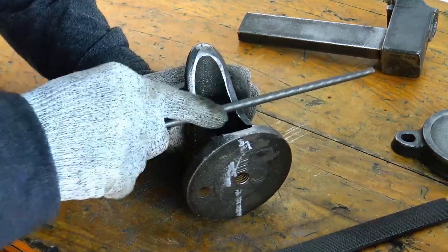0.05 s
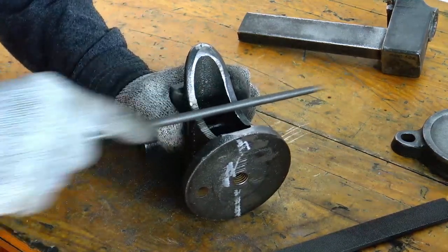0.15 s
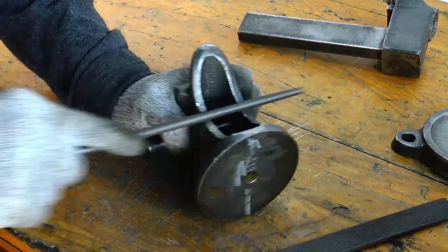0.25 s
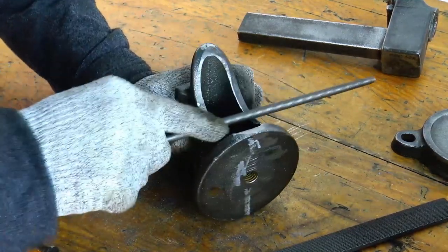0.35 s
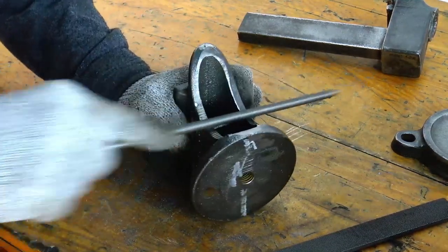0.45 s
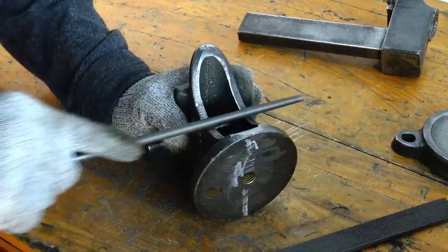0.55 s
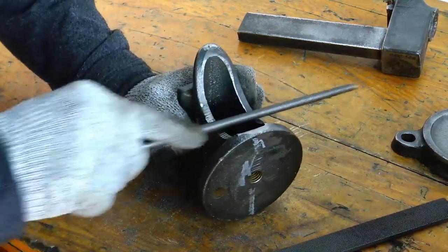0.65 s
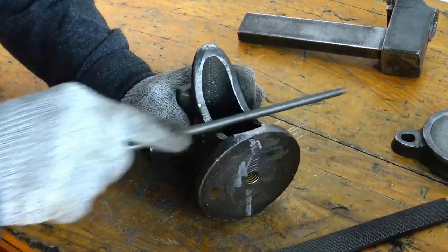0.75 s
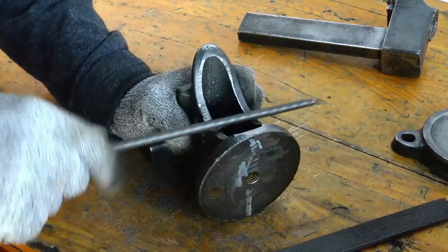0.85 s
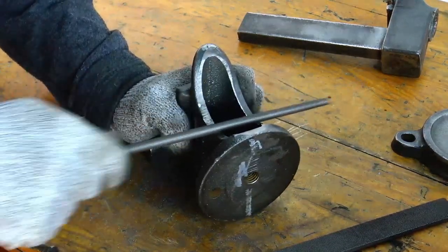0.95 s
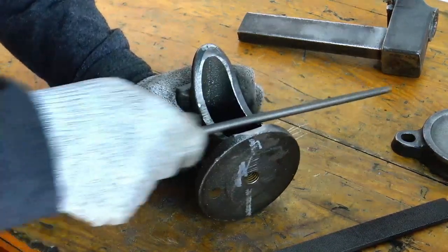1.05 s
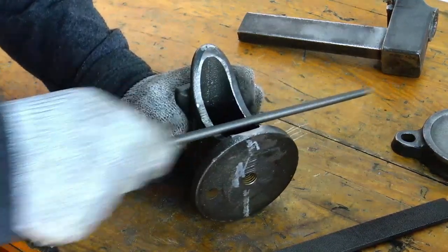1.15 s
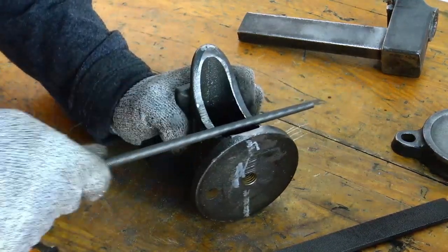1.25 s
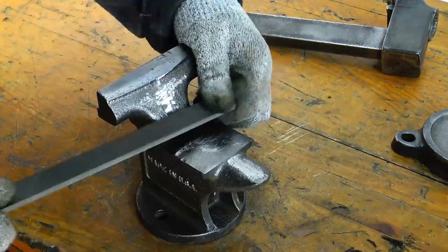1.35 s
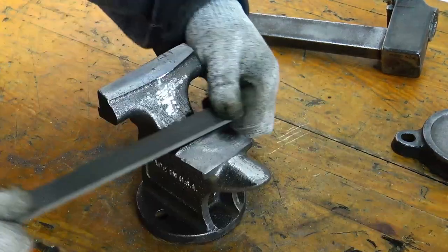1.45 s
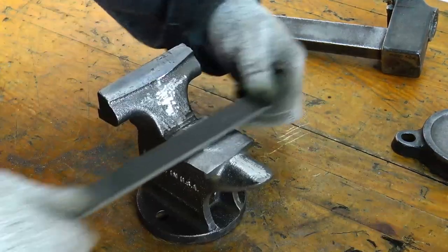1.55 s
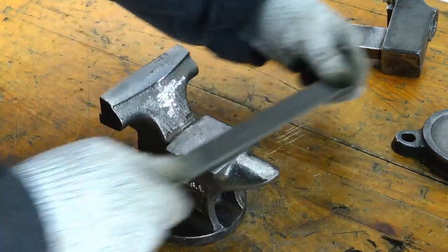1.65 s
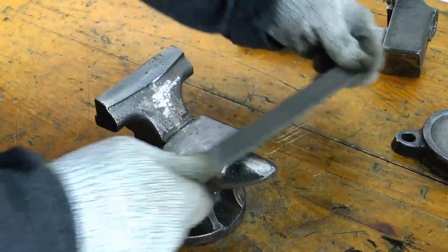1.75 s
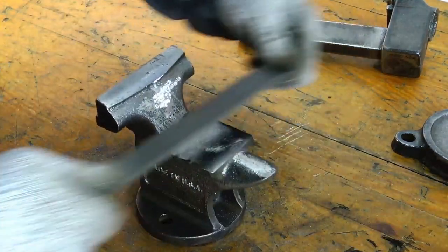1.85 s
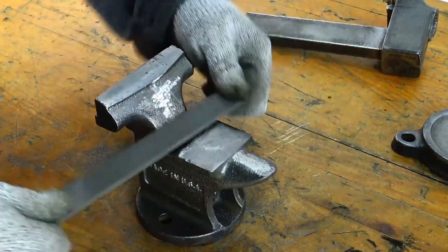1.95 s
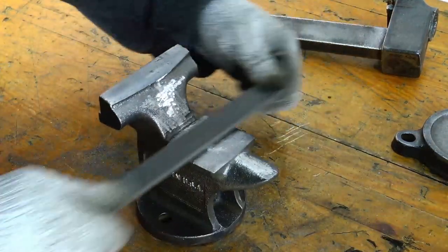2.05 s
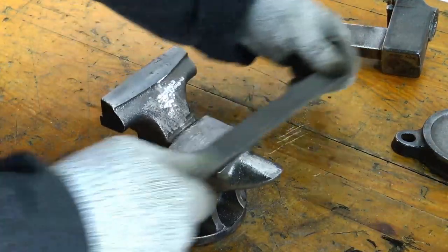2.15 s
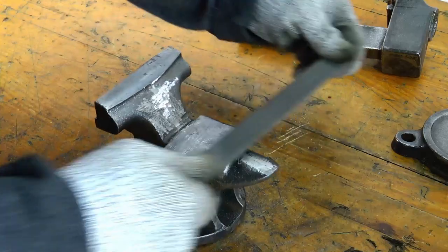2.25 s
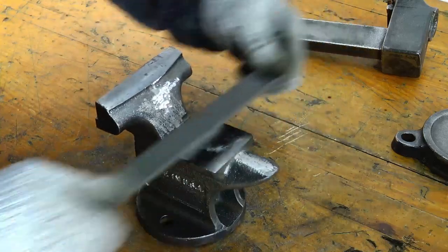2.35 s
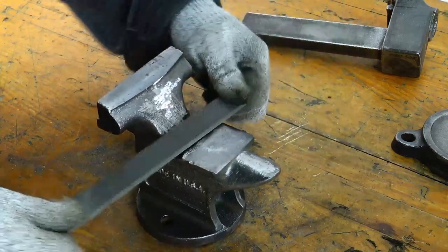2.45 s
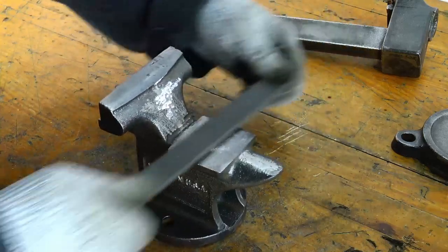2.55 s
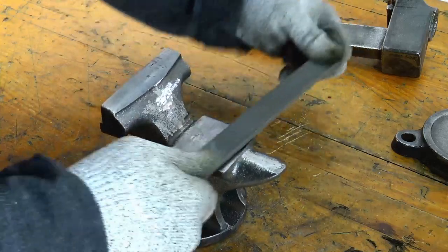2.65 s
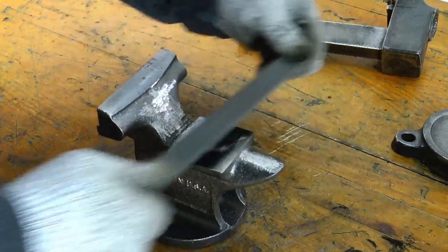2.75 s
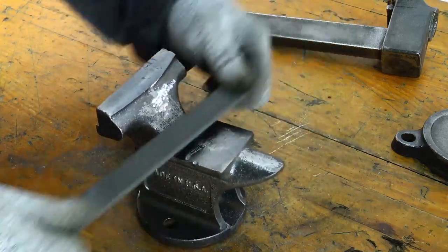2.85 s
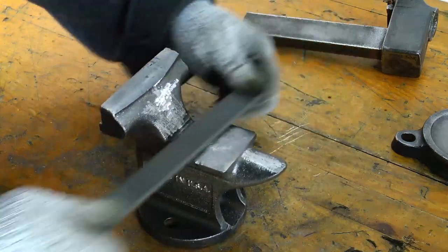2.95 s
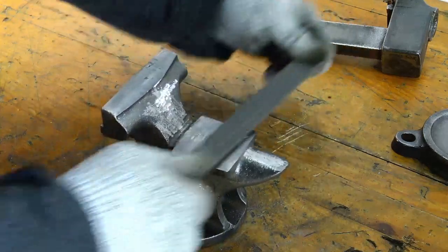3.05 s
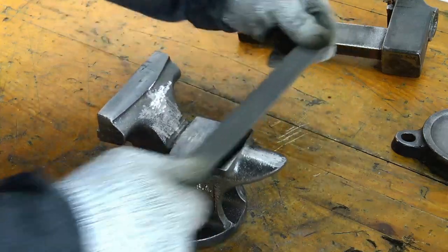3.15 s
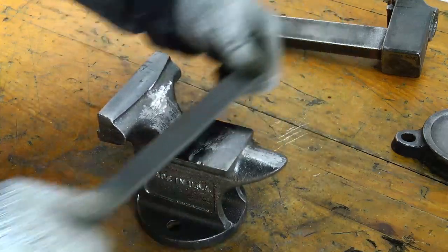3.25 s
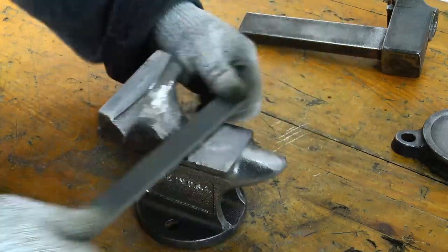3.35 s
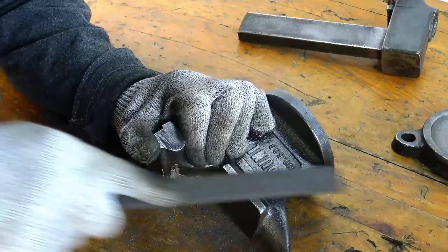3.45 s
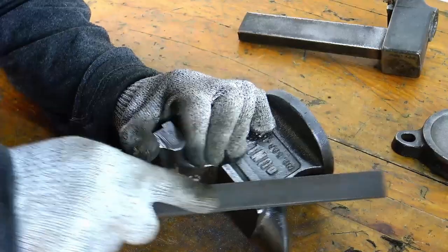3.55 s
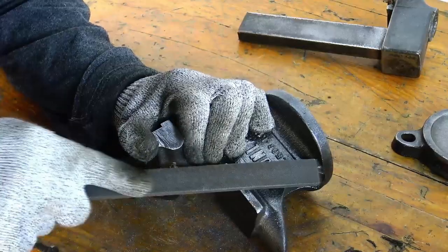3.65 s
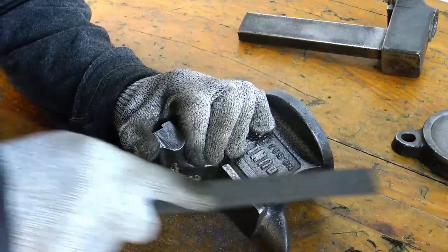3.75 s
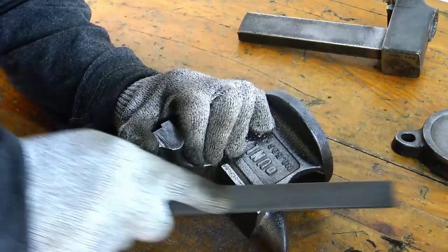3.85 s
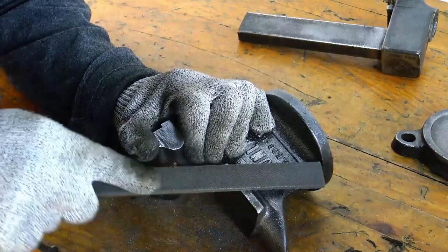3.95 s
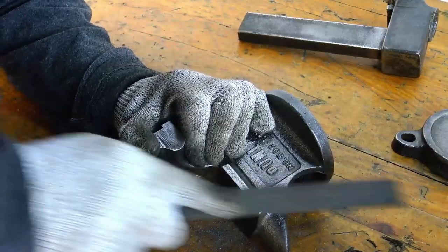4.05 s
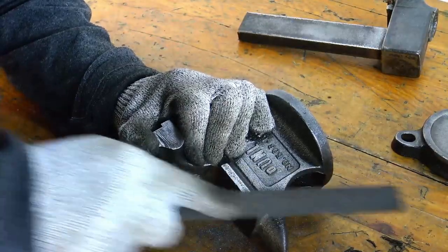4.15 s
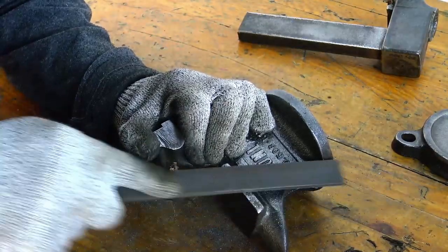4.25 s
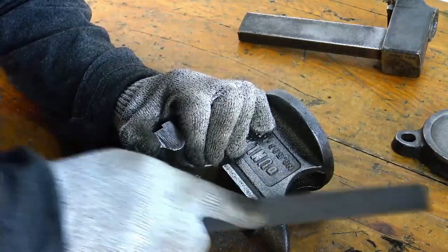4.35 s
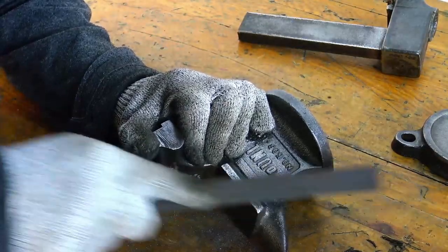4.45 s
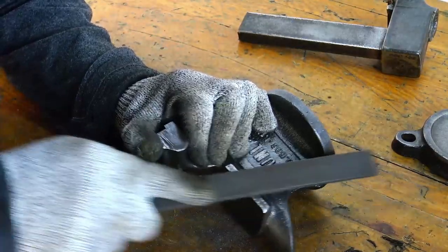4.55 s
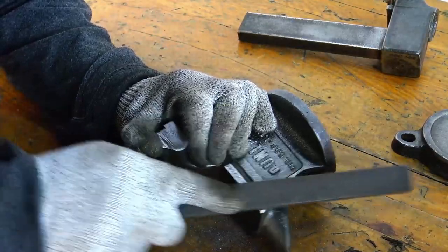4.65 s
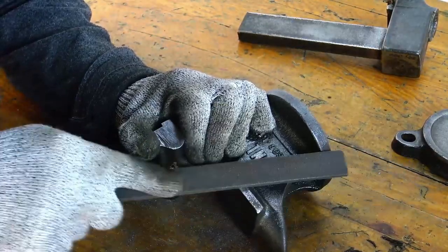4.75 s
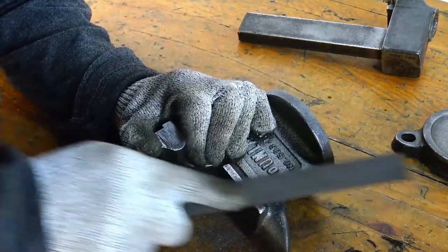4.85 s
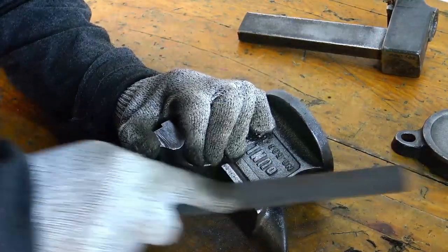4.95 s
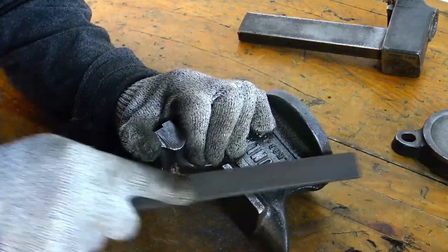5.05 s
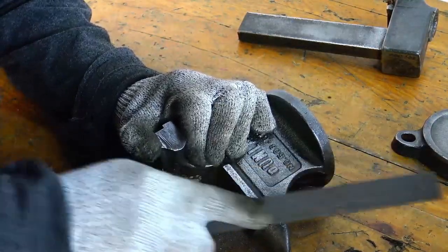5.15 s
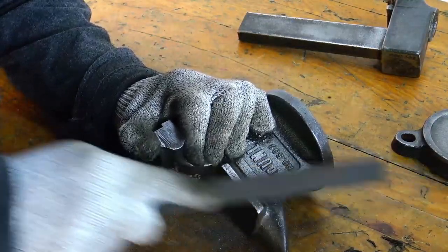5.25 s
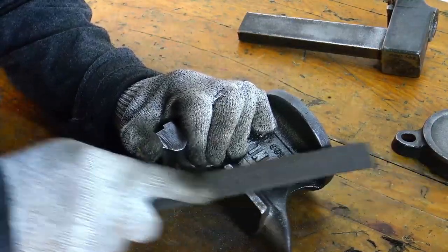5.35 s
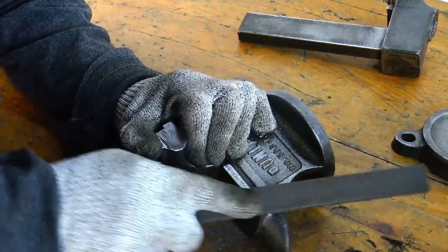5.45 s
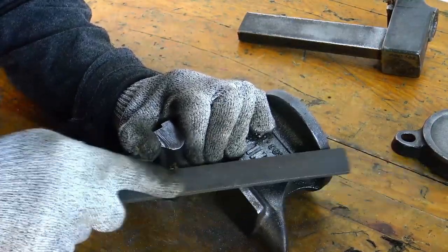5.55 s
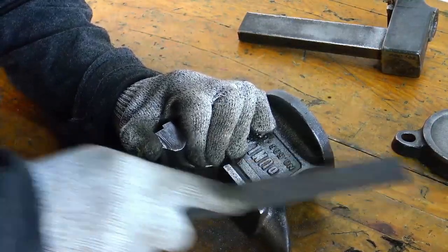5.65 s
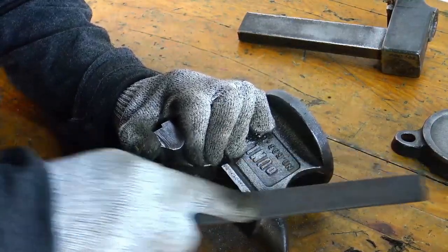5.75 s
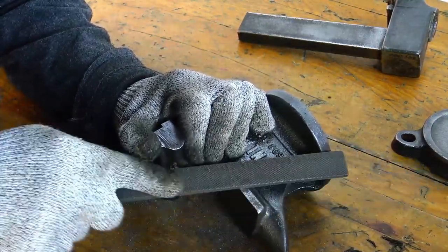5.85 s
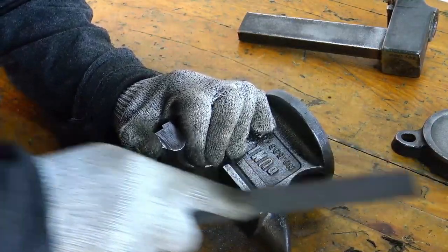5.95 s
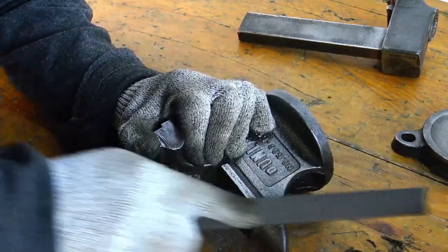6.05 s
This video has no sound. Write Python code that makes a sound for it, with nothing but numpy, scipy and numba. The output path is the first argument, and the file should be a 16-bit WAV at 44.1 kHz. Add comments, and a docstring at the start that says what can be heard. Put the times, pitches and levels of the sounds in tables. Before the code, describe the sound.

Close up in a dull, quiet workshop, a coarse round file saws quickly in a hollow iron casting, growling and juddering, with thin squeals on some strokes. Then four separate long sweeps of a flat file, brighter and hissing, with pitch gliding, clacks and wooden thumps between. Finally the flat file scrubs an iron edge in rapid, alternating short strokes until the end.

```python
"""A round file saws to and fro in a hollow iron casting, squealing on some strokes; a flat file then makes
long one-way strokes, lifted and set down between them, and at last scrubs an edge with quick short strokes.
Teeth and grit excite file, casting and bench as filtered impulse trains; damped modes of the iron ring on,
steel clacks on iron, and the vice rocks on the wooden bench, in a dull room with a quiet background."""
import sys
import numpy as np
from scipy import signal
from scipy.io import wavfile
from scipy.ndimage import uniform_filter1d
from numba import njit

SR = 44100
rng = np.random.default_rng(int(sys.argv[2]) if len(sys.argv) > 2 else 0)


def inscribe(sig):
    """Save sig as 16-bit PCM at rate SR to the path in sys.argv[1].

    A 1-D sig is mono; a 2-D sig holds one channel per row.
    Samples are clipped to [-1, 1] before scaling.
    """
    pcm = np.round(np.clip(np.atleast_2d(sig).T, -1, 1) * 32767)
    wavfile.write(sys.argv[1], SR, pcm.astype(np.int16))


N = 269451
T = np.arange(N) / SR

# Damped resonances of flat file, vice and bench.
# Each row: centre in Hz, half-width in Hz, lift over the broad spectrum in dB.
FLAT_FILE_BODY = [(177.6, 32, 13), (400, 29, 3.7), (654, 150, 5.6), (970, 27, 6.5), (4090, 190, 10.9),
                  (4550, 100, 3), (5630, 540, 9.7), (5840, 420, 1.1), (7850, 500, 9.6), (9330, 350, 7),
                  (9900, 100, 3.7), (11420, 220, 11), (13400, 800, 12)]
# Long-ringing modes of the vice. Each row: frequency in Hz, relative level in dB, 60 dB decay time in seconds.
VICE_RING = [(3072, -12, 0.24), (3990, -35.5, .2), (5250, -29, 0.13), (5405, -25.5, 0.29),
             (5920, -19.5, 0.098), (6490, -15.5, .15), (7500, -17, 0.11), (8530, -11, .2),
             (10435, -16, .22), (11900, -30, 0.18), (14420, -18, .1)]


def from_db(db):
    """Amplitude ratio: twenty decibels are a factor of ten."""
    return 10 ** (np.asarray(db) / 20)


def rms_one(x):
    """Normalisation to unit mean power."""
    return x / np.sqrt(np.mean(x ** 2) + 1e-20)


def steady(x, size=1100):
    """Envelope removal: division by the short-time RMS keeps the fine grain; size in samples."""
    power = uniform_filter1d(uniform_filter1d(x ** 2, size), size)
    return x / np.sqrt(np.abs(power) + 1e-20)


def drift(rate):
    """Random modulation: straight lines join normal random knots of unit spread, `rate` a second."""
    knots = rng.standard_normal(N // 20)
    return np.interp(T * rate, np.arange(len(knots)), knots)


def band(x, hz, kind):
    """Band selection by a Butterworth filter of design order four."""
    return signal.sosfilt(signal.butter(4, hz, kind, fs=SR, output="sos"), x + 1e-18)


def colour(x, spectrum, body=(), size=8192):
    """Minimum-phase filtering: a broad spectrum with resonant humps, made causal through its cepstrum."""
    grid = np.maximum(np.fft.rfftfreq(size, 1 / SR), 1)
    points = np.array(spectrum)
    level = np.interp(np.log(grid), np.log(points[:, 0]), points[:, 1])
    for hz, half_width, lift_db in body:
        level = level + lift_db / (1 + ((grid - hz) / half_width) ** 2)
    # folding the cepstrum onto positive time gives minimum phase
    cepstrum = np.fft.irfft(np.log(from_db(level)))
    cepstrum[1:size // 2] *= 2
    cepstrum[size // 2 + 1:] = 0
    response = np.fft.irfft(np.exp(np.fft.rfft(cepstrum)))
    return signal.fftconvolve(x, response)[:len(x)]


def ring(x, hz, t60):
    """Damped oscillator: a unit click starts a decaying sine of initial height 1."""
    radius = from_db(-60 / (t60 * SR))
    angle = 2 * np.pi * hz / SR
    return signal.lfilter([0, np.sin(angle)], [1, -2 * radius * np.cos(angle), radius ** 2], x + 1e-18)


def iron(x, modes):
    """Modal superposition: a vibration feeds the long modes of the metal in parallel."""
    return sum(from_db(db) * ring(x, hz, t60) for hz, db, t60 in modes) / 100


@njit
def glide(x, turn, keep):
    """Time-varying resonance: a rotating, decaying phasor; turn in radians a sample."""
    out, state = np.zeros(len(x)), 0j
    for i in range(len(x)):
        state = state * keep * np.exp(1j * turn[i]) + x[i]
        out[i] = state.real
    return out


def blade(force, hz, width_hz):
    """Forced resonance: a bending mode, of bandwidth `width_hz`, driven at the contact."""
    return steady(glide(force, 2 * np.pi * hz / SR, np.exp(-np.pi * width_hz / SR)))


def bending(force, place, modes, stray):
    """Length sets pitch: pushed forward, the longer tip side falls while the handle side rises."""
    stray_octaves, rate, flicker_db = stray
    total = 0
    for hz, octaves, width, db in modes:
        centre = hz * 2 ** (octaves * (place - .5) + stray_octaves * drift(rate))
        total = total + from_db(db + flicker_db * drift(35)) * blade(force, centre, width)
    return total


def flares(force, modes):
    """Selective excitation: the wandering contact favours fixed modes in turn."""
    flare_db, flares_per_s = 7, 37
    total = 0
    for hz, width, db in modes:
        gain = from_db(db + flare_db * drift(flares_per_s))
        total = total + gain * blade(force, np.full(N, hz), width)
    return total


def hump(start, end, peak):
    """Stroke kinematics: a rise from rest to 1 at the share `peak` of the stroke, and a return to rest."""
    top = start + np.clip(peak, .05, .95) * (end - start)
    return np.sin(np.pi / 2 * np.interp(T, [start, top, end], [0, 1, 0]))


def swells(rows):
    """Amplitude modulation: the gain of a note that swells and fades once for each row."""
    return sum(from_db(db) * hump(start, end, peak) for start, end, peak, db in rows)


def motion(strokes, law):
    """Power-law excitation: progress 0-1, and gains of rumble and growl (pressure) and rasp (speed)."""
    # Time constants in seconds with which bench, casting and teeth build up and die away.
    lag_s = (0.016, 0.0034, 0.0013)
    progress, gains = np.zeros(N), np.zeros((3, N))
    for start, end, fastest, hardest, *levels_db in strokes:
        during = (T >= start) & (T < end)
        begun = T >= start
        progress[begun] = np.minimum((T[begun] - start) / (end - start), 1)
        pressure = hump(start, end, hardest)[during]
        speed = hump(start, end, fastest)[during]
        for k, drive in enumerate((pressure, pressure, speed)):
            gains[k, during] += from_db(levels_db[k]) * drive ** abs(law[k])
    keeps = np.exp(-1 / (np.array(lag_s) * SR))
    lagged = [signal.lfilter([1 - keep], [1, -keep], gain + 1e-18) for keep, gain in zip(keeps, gains)]
    return progress, lagged


def teeth(progress, tooth_hz, uneven, grit_per_s, grit_db, spread_db):
    """Impulsive excitation: teeth strike at a rate set by hand speed; chips break off at random."""
    speed = .25 + .75 * np.sin(np.pi * progress)
    tooth_rate = tooth_hz * speed * (1 + uneven * drift(900) + .04 * drift(40))
    passed = np.cumsum(tooth_rate) / SR
    # each strike is shared between two samples, by where it falls
    edge = np.diff(np.floor(passed), prepend=0) > 0
    late = np.clip((passed % 1) / np.maximum(np.gradient(passed), 1e-6), 0, 1)
    force = edge * from_db(2.5 * rng.standard_normal(N))
    strikes = force * (1 - late) + np.roll(force * late, -1)
    strikes = strikes - uniform_filter1d(strikes, size=90)
    chips = (rng.random(N) < grit_per_s * speed / SR) * rng.choice([-1, 1], N)
    chips = chips * from_db(spread_db * np.minimum(rng.exponential(1, N), 4))
    return steady(strikes) + from_db(grit_db) * steady(chips)


def patchy(force):
    """Band-wise modulation: rows of teeth bite unevenly, so the brightness of the cut comes in clumps."""
    patch_db, patches_per_s = 3.2, 32
    bands, rest = [], force
    # edges a little under a third of an octave apart
    for hz in np.geomspace(1100, 12000, 13):
        low = signal.sosfiltfilt(signal.butter(4, hz, fs=SR, output="sos"), rest)
        bands.append(low)
        rest = rest - low
    return sum(part * from_db(patch_db * drift(patches_per_s)) for part in bands + [rest])


def rasp(force, gains, spectrum, body, chatter_db, chatter_rate):
    """Source and filter: the chattering cutting force shakes bench (low), casting (mid) and teeth (high)."""
    chatter = from_db(chatter_db * drift(chatter_rate))
    shaken = colour(patchy(force) * chatter, spectrum, body)
    parts = band(shaken, 300, "low"), band(shaken, [300, 1800], "band"), band(shaken, 1800, "high")
    return sum(gain * steady(part, size=700) for gain, part in zip(gains, parts))


def round_file():
    """Forced vibration with judder: a coarse round file saws in a hollow casting held in the hand."""
    # Each row: start and end in seconds, shares of the stroke at which the hand is fastest and presses
    # hardest, then relative levels in dB of bench rumble, casting growl and rasp of the teeth.
    strokes = [(-0.04, 0.115, 0.49, 0.25, -33.5, -23.7, -35.5), (0.114, 0.272, 0.46, 0.63, -37, -19.5, -28),
               (0.275, 0.431, 0.65, 0.33, -32, -35, -37.5), (0.423, 0.581, 0.64, 0.81, -32.9, -23.5, -28),
               (0.581, 0.775, 0.46, 0.26, -33.5, -30.5, -41), (0.76, 0.948, 0.24, 0.25, -40, -35, -42.5),
               (0.947, 1.146, 0.68, 0.69, -41.5, -32.5, -44.5), (1.14, 1.319, 0.58, 0.6, -35, -24, -26)]
    # Exponents: rumble and growl on pressure, rasp on speed.
    law = (0.83, 1.36, 2.17)
    # Broad colour. Each row: frequency in Hz, relative level in dB.
    spectrum = [(29, -43.5), (50, 7), (180, -3.5), (271, -1), (398, -5.5), (507, -6.5), (973, -12.5),
                (1240, -24.5), (1600, -27), (2750, -27.5), (3030, -22), (4900, -31), (6550, -27.5),
                (7040, -42.5), (14500, -53.5), (16000, -62)]
    # Resonances of file, casting and bench. Each row: centre in Hz, width in Hz, lift in dB.
    body = [(179.4, 26, 12.5), (333.6, 7.2, -4), (404.3, 70, 18), (662, 127, 10.5), (953, 146, 12.5),
            (1434, 200, 6.5), (3900, 78, 3.5), (5820, 47, -11.5), (7700, 240, 8), (8320, 500, 9.5),
            (10400, 130, 12.5), (11080, 180, -9), (12250, 930, 11), (14520, 290, 16)]
    # Long modes fed by the teeth. Each row: frequency in Hz, relative level in dB, 60 dB decay in seconds.
    ringing = [(3130, -24.5, 0.22), (5930, -6.5, 0.097), (6487, -8.5, 0.16), (11340, 3.5, 0.048),
               (11700, -18, 0.065), (13480, -19.5, .12), (13800, -11, .1), (14300, -7, .08)]
    progress, gains = motion(strokes, law)
    force = steady(teeth(progress, tooth_hz=1250, uneven=.15, grit_per_s=6000, grit_db=2, spread_db=3.3))
    # the contact wanders round the hole and favours now one resonance, now another
    favoured = 0
    for hz, width, _ in body:
        favoured = favoured + from_db(-15 + 7 * drift(35)) * blade(force, np.full(N, hz), width)
    force = force + favoured
    # the whole file bounces some fifty times a second
    judder_hz = 48 + 10 * drift(20)
    judder = from_db(2 * np.sin(2 * np.pi * np.cumsum(judder_hz) / SR))
    cut = rasp(force, gains, spectrum, body, chatter_db=3.5, chatter_rate=300)
    sound = from_db(-1.5) * judder * cut
    return sound + from_db(13.5) * iron(sound, ringing)


def zing():
    """Noise-driven resonance: grit feeds a high, damped mode of the round file."""
    # Each row: start and end in seconds, share at which it peaks, level in dB.
    rows = [(0.0, .1, 0.39, -40), (.13, .25, 0.52, -48), (.46, .57, 0.64, -52)]
    singing = band(ring(rng.standard_normal(N), 14310, .03), 12000, "high")
    return swells(rows) * steady(singing)


def burst(s, t60):
    """Exponential decay: a dying flurry of tiny contacts, of unit energy."""
    age = np.arange(SR // 10) / SR
    flurry = rng.standard_normal(len(age)) * from_db(-60 * age / t60)
    out, at = np.zeros(N + len(age)), max(int(s * SR), 0)
    out[at:at + len(age)] = flurry / np.linalg.norm(flurry)
    return out[:N]


def thumps():
    """Impact on a modal structure: the base drops on the wood, each blow with mode strengths of its own."""
    # The casting rocks. Each row: start in seconds, relative level in dB, hard edge in dB relative to it.
    blow_rows = [(0.138, -29.5, -19), (0.301, -26.5, -7), (0.479, -40, 25), (0.807, -28, -7),
                 (0.845, -31.5, -15), (1.145, -28.5, 13.5), (1.373, -40, 8.5), (1.45, -40, -6),
                 (1.776, -27, -9), (1.981, -34.5, -7), (2.011, -25.5, 0), (2.275, -22.5, -1),
                 (2.74, -17.5, -2), (2.759, -43, 10), (3.158, -31, -9), (3.35, -30, -10), (4.795, -26, -24)]
    # Bench modes. Each row: frequency in Hz, relative level in dB, 60 dB decay time in seconds.
    bench = [(70.7, -3, 0.29), (103.8, -5.5, 0.42), (143.2, 3.5, 0.15), (180.3, 8, 0.15), (252.2, -2, 0.21),
             (330, -3, 0.15), (394.4, -2, 0.2), (457, -7, 0.14), (621, -10.5, 0.13), (724, -23, 0.14),
             (946, -37, .08)]
    s, level_db, edge_db = np.transpose(blow_rows)
    strengths_db = rng.normal(0, 1.76, (len(s), len(bench)))
    out = np.zeros(N)
    for k, (hz, db, t60) in enumerate(bench):
        blows = np.zeros(N)
        blows[(s * SR).astype(int)] = from_db(level_db + db + strengths_db[:, k] - 3.5)
        out += (-1) ** k * ring(blows, hz, t60)  # neighbouring modes have opposite sign
    rattle = sum(from_db(db) * burst(at, t60=0.17) for at, db in zip(s, level_db + edge_db))
    # Hz, relative dB
    rattle_colour = [(60, -22.0), (200, 9.5), (500, 0), (1000, -7), (2500, -32.5), (12000, -53.5)]
    return out + from_db(31.5) * colour(rattle, rattle_colour)


def clacks():
    """Impact excitation: steel meets iron in a short crack, a dull knock under it, and a ring."""
    # The file lands or a tooth catches.
    # Each row: start in seconds, relative level in dB, dull part in dB relative to it.
    impacts = [(0.148, -21.5, -3), (0.3064, -36, 8), (0.447, -25, 2), (0.5298, -31, 0), (0.603, -30.5, 28),
               (0.815, -39, -7), (0.826, -32, -4), (1.176, -25.5, -1), (1.4552, -25, 20), (1.4708, -22, 4),
               (1.9799, -17.5, 21), (2.0142, -18.5, 14), (2.4807, -15.5, 13), (2.9373, -3.5, -10),
               (3.3502, -29, 24), (3.3858, -26, 28.5), (3.414, -22, 27), (3.468, -21.5, -3),
               (4.043, -33, 0), (4.208, -18, 0), (5.004, -37, 0), (5.3126, -13, -7)]
    # Broad colour of the crack. Each row: frequency in Hz, relative level in dB.
    crack_colour = [(120, -5.5), (200, 2.5), (968, -9.5), (1320, 1.5), (2510, -19.5), (4200, 1.5),
                    (7830, -17), (8580, -19), (9060, -14), (13800, -19), (16000, -48)]
    cracks, knocks = np.zeros(N), np.zeros(N)
    for s, db, dull_db in impacts:
        cracks += from_db(db) * burst(s, t60=0.032)
        knocks += from_db(db + dull_db) * burst(s, t60=0.068)
    crack = from_db(13.5) * colour(cracks, crack_colour, FLAT_FILE_BODY)
    # Hz, relative dB
    knock_colour = [(100, -4.5), (400, 1.5), (1000, -13.5), (1900, -5.5), (2800, -21.0), (9000, -36.5)]
    knock = from_db(2.5) * colour(knocks, knock_colour, [(1340, 83, 8)])
    return crack + knock + from_db(18) * iron(crack, VICE_RING)


def squeal():
    """Stick and slip: friction locks onto one mode of the casting, a rough, wavering whistle."""
    # Each row: start and end in seconds, share at which it peaks, level in dB before the roughness.
    rows = [(.345, .425, 0.52, -38.5), (.6, .645, 0.52, -45), (.655, .735, .48, -40.5),
            (.985, 1.135, 0.37, -29), (1.19, 1.28, 0.8, -27.5)]
    centre_hz, waver_hz, rough_db = 3083, 29.7, 6.5
    hz = centre_hz + waver_hz * drift(150)
    whistle = np.sin(2 * np.pi * np.cumsum(hz) / SR)
    return swells(rows) * from_db(rough_db * drift(150)) * whistle


def long_strokes():
    """Forced vibration with gliding modes: a fine flat file sweeps forward over the anvil of the vice."""
    # Each row: start and end in seconds, shares of the stroke at which the hand is fastest and presses
    # hardest, then relative levels in dB of bench rumble, casting growl and rasp of the teeth.
    strokes = [(1.48, 1.785, 0.65, 0.61, -52, -43, -29.5), (2.011, 2.276, 0.53, 0.5, -47.5, -43.5, -28.5),
               (2.502, 2.737, 0.49, 0.58, -49, -42, -28), (2.92, 3.17, 0.57, 0.6, -53, -44, -32.5)]
    # Exponents: rumble and growl on pressure, rasp on speed.
    law = (0.11, 1, 3.2)
    # Bending modes. Each row: mid-stroke Hz, octaves moved from tip to handle, width in Hz, relative dB.
    blade_modes = [(584, -0.14, 44, -17.5), (1180, -0.37, 260, -8), (2190, 1, 160, -9.5), (3020, 1, 520, 0),
                   (5330, -0.56, 300, -11.5), (6600, -0.84, 340, 1), (10000, -0.098, 280, -12),
                   (12500, -0.63, 300, -19)]
    # The grip shifts: stray in octaves, changes a second, flicker in dB.
    stray = (.11, 22, 5)
    # Vice modes that flare as the file crosses. Each row: frequency in Hz, width in Hz, relative dB.
    flare_modes = [(648, 31, -19.5), (966, 40, -10.5), (1380, 58, -11), (2060, 120, -6.5), (2820, 75, -9),
                   (3150, 120, -10), (5600, 130, -19.5), (7510, 200, -8), (9300, 200, -13),
                   (10400, 200, -21)]
    # Broad colour. Each row: frequency in Hz, relative level in dB.
    spectrum = [(29, -63), (50, -1), (152, -16.5), (189, -3), (298, -12), (398, 2.5), (532, -17), (646, -6),
                (729, -13), (950, -12.5), (1700, -10.5), (3100, -8), (5020, -7.5), (7570, -4),
                (16000, -9.5)]
    progress, gains = motion(strokes, law)
    # the hand advances in small jerks
    jerk_share, jerks_per_s = .09, 30
    place = progress + jerk_share * drift(jerks_per_s)
    force = steady(teeth(progress, tooth_hz=3890, uneven=0.04, grit_per_s=14000, grit_db=12.5, spread_db=3))
    bent = from_db(4) * bending(force, place, blade_modes, stray)
    force = force + bent + flares(force, flare_modes)
    sound = rasp(force, gains, spectrum, FLAT_FILE_BODY, chatter_db=3.0, chatter_rate=230)
    return sound + from_db(7.0) * iron(sound, VICE_RING)


def lift_offs():
    """Plucked modes: the file slips off the anvil and its last tooth sets two long notes ringing."""
    # Each row: start in seconds, level of the low note in dB, level of the high note in dB.
    slips = [(1.755, -56.5, -46), (2.25, -79.5, -48), (2.721, -63, -57), (3.141, -57, -60)]
    s, low_db, high_db = np.transpose(slips)
    plucks = np.zeros((2, N))
    plucks[:, (s * SR).astype(int)] = from_db([low_db, high_db])
    return ring(plucks[0], 3068, .62) + ring(plucks[1], 5402, .21)


def travel(strokes):
    """Reciprocating motion: the contact eases along the file from one turning point to the next."""
    place, previous = np.zeros(N), 0
    for start, end, *_, turn in strokes:
        share = np.clip((T - start) / (end - start), 0, 1)
        place += (turn - previous) * (1 - np.cos(np.pi * share)) / 2
        previous = turn
    return place


def short_strokes():
    """Forced vibration with swooping modes: the flat file scrubs an edge to and fro."""
    # Each row: start and end in seconds, shares of the stroke at which the hand is fastest and presses
    # hardest, relative levels in dB of bench rumble, casting growl and rasp of the teeth, and the place
    # on the file where the stroke turns round (0 tip, 1 handle).
    strokes = [(3.334, 3.445, 0.85, 0.95, -38.5, -29.5, -45.5, 0.77),
               (3.444, 3.583, 0.52, 0.48, -39.5, -26.3, -26, 1),
               (3.598, 3.72, 0.69, 0.78, -43.5, -33.5, -32, 0.764),
               (3.715, 3.885, 0.5, 0.51, -41.5, -40.5, -32.5, 0.17),
               (3.883, 4.014, 0.63, 0.78, -32, -23.5, -28, 0.98),
               (4.003, 4.174, 0.63, 0.69, -40, -33, -26.5, 0.27),
               (4.168, 4.303, 0.57, 0.5, -41, -31, -28.5, 0.15),
               (4.286, 4.44, 0.68, 0.8, -42, -34, -31.5, 0.55),
               (4.436, 4.567, 0.51, 0.56, -47, -35, -33, 0.06),
               (4.559, 4.696, 0.63, 0.85, -40.5, -38.5, -39, 0.66),
               (4.7, 4.83, 0.49, 0.56, -38.5, -35, -38.5, 0.16),
               (4.801, 4.969, 0.64, 0.82, -43.5, -33, -36.5, 0.52),
               (4.976, 5.105, 0.35, 0.33, -40.5, -31, -31, 0.16),
               (5.101, 5.23, 0.7, 0.85, -39, -26.5, -30.0, 0.474),
               (5.237, 5.37, 0.57, 0.47, -38.5, -32, -32, 0.12),
               (5.365, 5.504, 0.61, 0.78, -41, -33.5, -36.5, 0.73),
               (5.508, 5.638, 0.48, 0.6, -39.5, -34.5, -33, 0.06),
               (5.625, 5.77, 0.68, 0.89, -40.5, -30.5, -32.5, 0.67),
               (5.778, 5.928, 0.59, 0.63, -35.5, -30.5, -31.5, 0.051),
               (5.908, 6.077, 0.62, 0.69, -44, -38.5, -34.5, 0.59)]
    # Exponents: rumble and growl on pressure, rasp on speed.
    law = (0.31, 2.24, 2.24)
    # Bending modes. Each row: Hz at mid-file, octaves moved from tip to handle, width in Hz, relative dB.
    blade_modes = [(789, -1.91, 104, 4.5), (1124, -1.83, 71, -22), (1876, 1, 170, -21),
                   (2700, -1.26, 250, -7.5), (3850, 0.44, 43, -17), (4970, -0.0059, 84, -14),
                   (7220, -0.25, 95, -12.5), (9640, -0.34, 380, -13.5), (12540, -0.32, 260, -10)]
    # The grip shifts: stray in octaves, changes a second, flicker in dB.
    stray = (.06, 16, 4.5)
    # Casting modes that flare as the edge catches. Each row: frequency in Hz, width in Hz, relative dB.
    flare_modes = [(424, 41, -18), (610, 90, -15.5), (705, 34, -6), (957, 54, -10.5), (1180, 50, -4.5),
                   (1357, 57, -6.5), (4080, 51, -8.5), (5346, 60, -14), (5550, 63, -12), (8440, 60, -15)]
    # Broad colour. Each row: frequency in Hz, relative level in dB.
    spectrum = [(29, -74), (50, -23.5), (180, 0), (277, -12.5), (408, -2), (601, -3), (783, -9.5),
                (950, -8), (1070, -15.5), (1500, -14.5), (3670, -15.5), (5400, -10), (8970, -21.5),
                (13800, -38), (16000, -39)]
    # Resonances of file, casting and bench. Each row: centre in Hz, half-width in Hz, lift in dB.
    body = [(180, 29, 6.6), (416, 35, 1.2), (612.3, 24.5, 8.2), (947, 95, 10), (1130, 79, 2.6),
            (2570, 84, 7.8), (3153, 52, 9.2), (4320, 23, 5.4), (4790, 500, 3.9), (7700, 200, 5.7),
            (10530, 160, 15), (11800, 190, 12), (13760, 890, 17)]
    # Long modes fed by the teeth. Each row: frequency in Hz, relative level in dB, 60 dB decay in seconds.
    ringing = [(3150, -25, 0.13), (5360, -26, 0.11), (8460, -8, 0.07), (8470, -14.5, .08),
               (14570, -5, 0.13)]
    progress, gains = motion(strokes, law)
    place = travel(strokes)
    force = steady(teeth(progress, tooth_hz=2512, uneven=.08, grit_per_s=4000, grit_db=11.5, spread_db=2.5))
    bent = from_db(2) * bending(force, place, blade_modes, stray)
    force = force + bent + flares(force, flare_modes)
    sound = rasp(force, gains, spectrum, body, chatter_db=3.0, chatter_rate=180)
    # the forward strokes cut and are brighter than the return strokes
    pushing = uniform_filter1d((np.gradient(place) > 0) * 1., size=400)
    treble = np.roll(band(sound, 8600, "high"), 40)  # delayed by 40 samples
    sound = sound + from_db(-9.5) * pushing * treble
    return sound + from_db(7.5) * iron(sound, ringing)


def workshop(x, t60, wet_db):
    """Reverberation: the walls return a weak, dull tail of decaying noise."""
    age = np.arange(SR // 2) / SR
    tail = rng.standard_normal(len(age)) * from_db(-60 * age / t60) * (age > .006)
    tail = colour(tail, [(100, 3.0), (800, -1.5), (4000, -7.5), (15000, -35.5)])
    return x + from_db(wet_db) * signal.fftconvolve(x, tail / np.linalg.norm(tail))[:N]


def room_tone():
    """Stationary noise: a random signal shaped by a fixed spectrum makes the quiet background."""
    # Each row: frequency in Hz, relative level in dB.
    tone_colour = [(15, -9), (25, -22), (108, 0.5), (157, -12), (607, -12.5), (1700, -28.5), (2220, -34),
                   (2990, -32), (3250, -31), (7920, -38.5), (16000, -40.5)]
    return from_db(-59) * rms_one(colour(rng.standard_normal(N), tone_colour))


def scene():
    """Linear superposition: all the bench work in the room, over its quiet background."""
    filing = round_file() + squeal() + zing() + long_strokes() + lift_offs() + short_strokes()
    work = filing + clacks() + thumps()
    return (workshop(work, t60=0.12, wet_db=-18.5) + room_tone())[None]


def record(dry):
    """Band limiting: the microphone sheds the deep bass, and the top is cut steeply."""
    thinned = signal.sosfilt(signal.butter(2, 52, "high", fs=SR, output="sos"), dry)
    return signal.sosfilt(signal.ellip(10, .2, 80, 15900, fs=SR, output="sos"), thinned)


dry = scene()
out = record(dry)
inscribe(out)
```